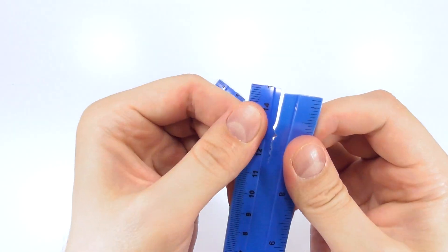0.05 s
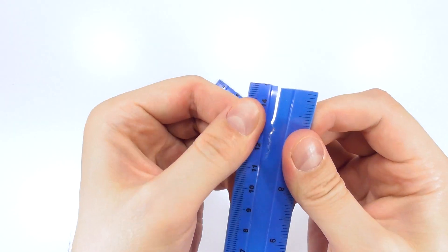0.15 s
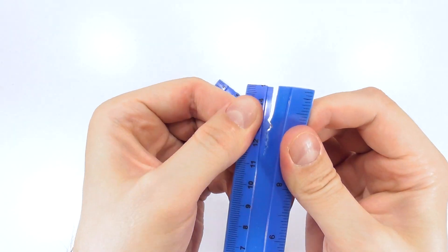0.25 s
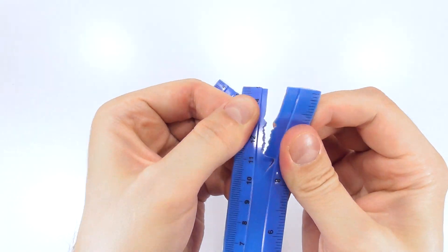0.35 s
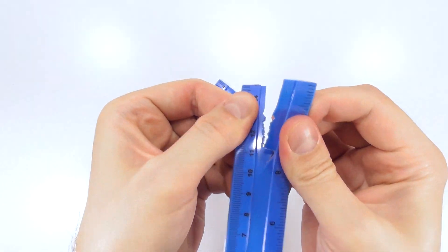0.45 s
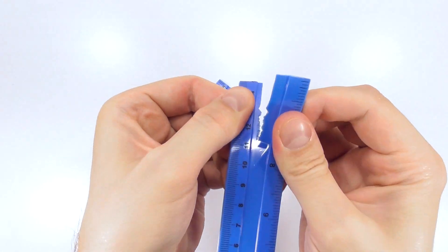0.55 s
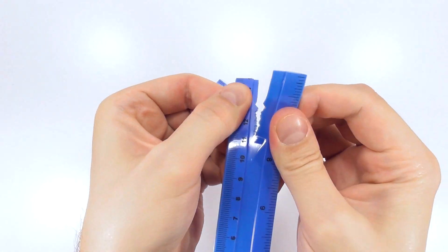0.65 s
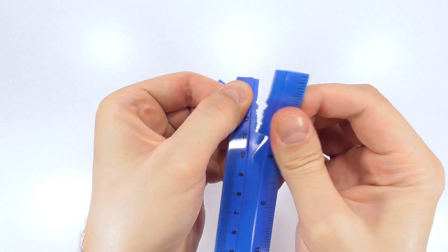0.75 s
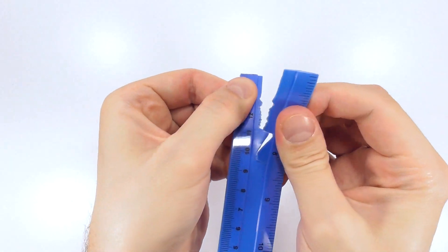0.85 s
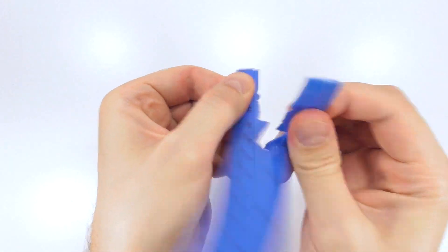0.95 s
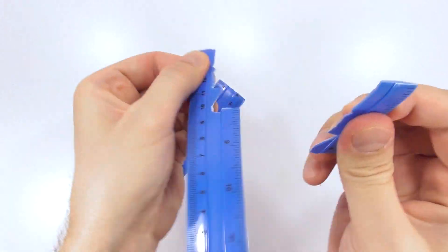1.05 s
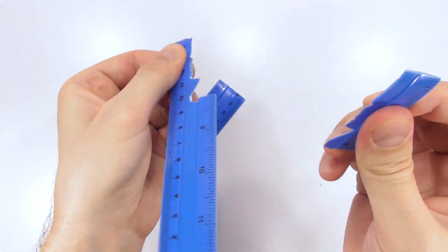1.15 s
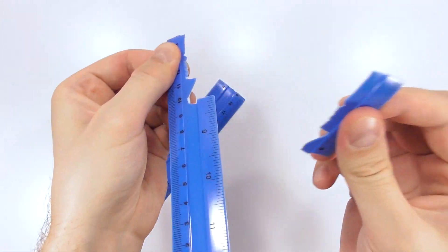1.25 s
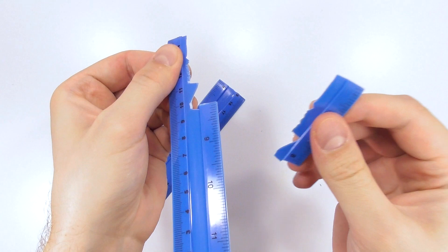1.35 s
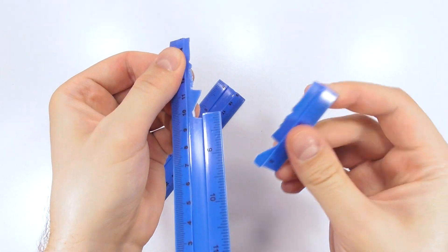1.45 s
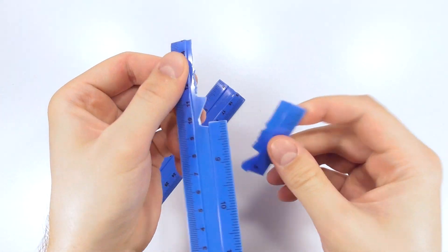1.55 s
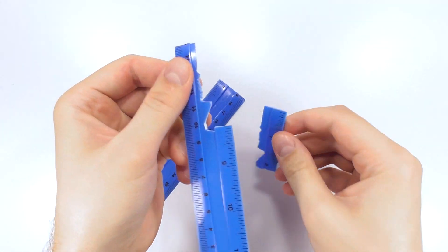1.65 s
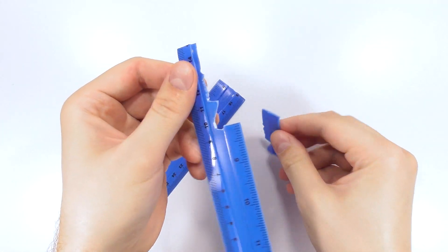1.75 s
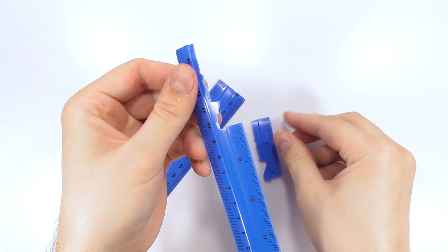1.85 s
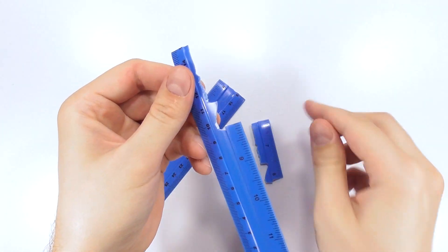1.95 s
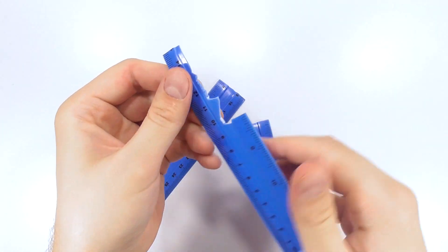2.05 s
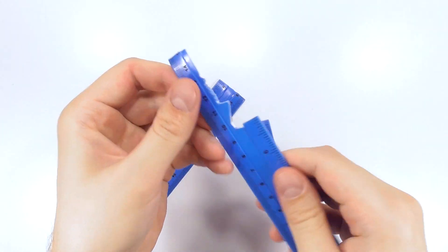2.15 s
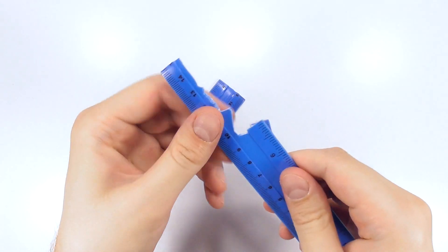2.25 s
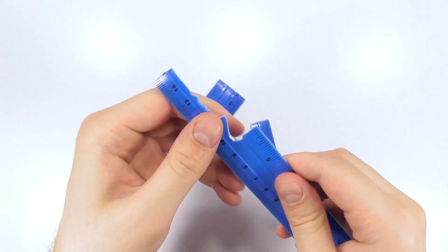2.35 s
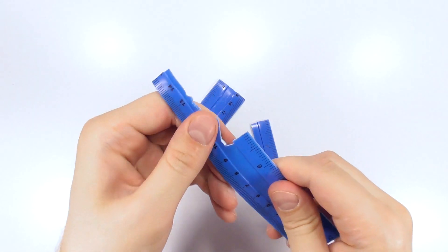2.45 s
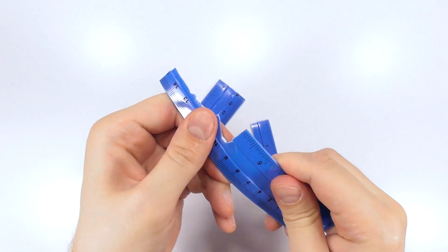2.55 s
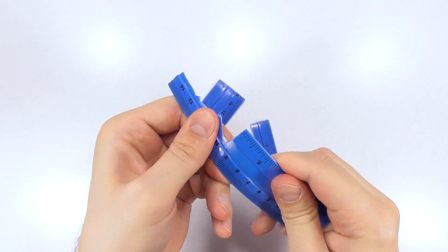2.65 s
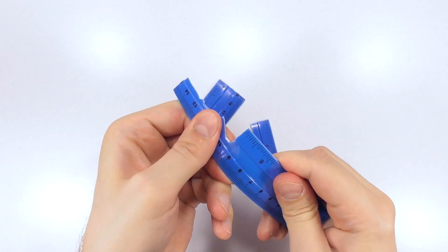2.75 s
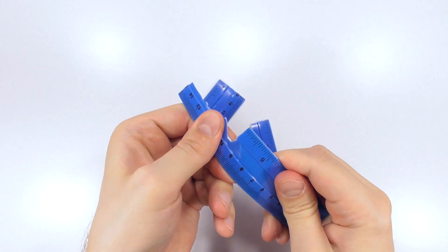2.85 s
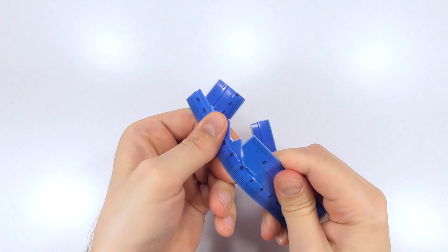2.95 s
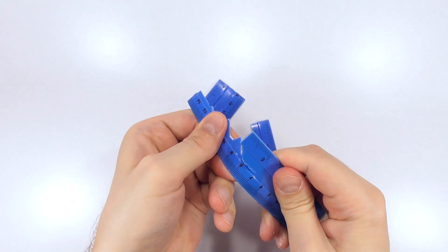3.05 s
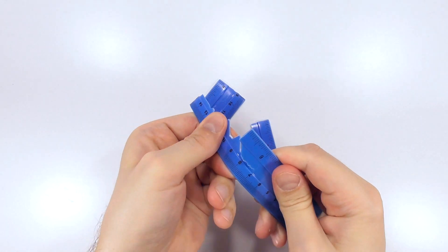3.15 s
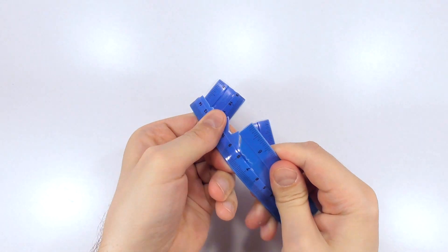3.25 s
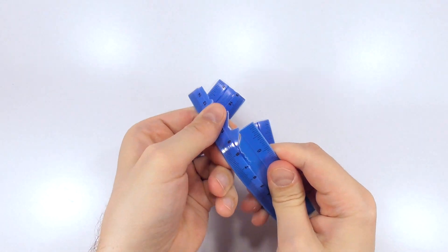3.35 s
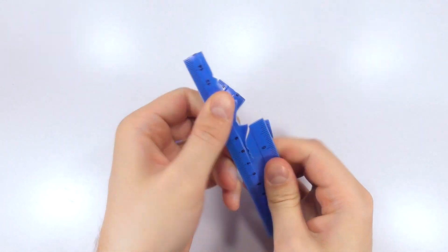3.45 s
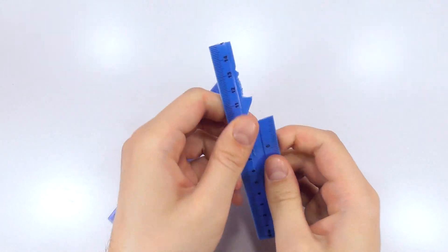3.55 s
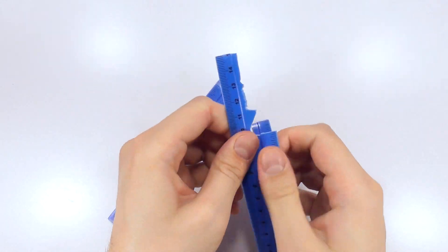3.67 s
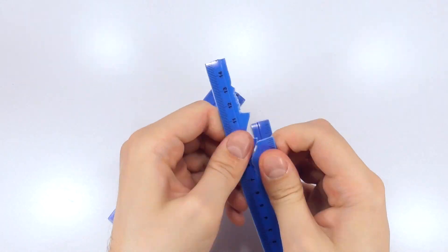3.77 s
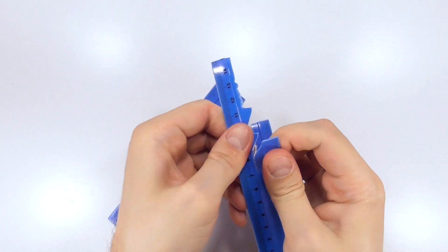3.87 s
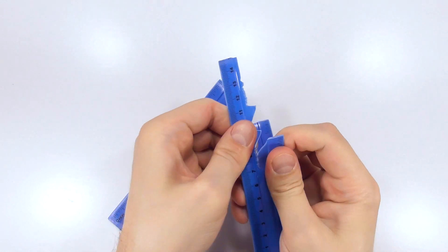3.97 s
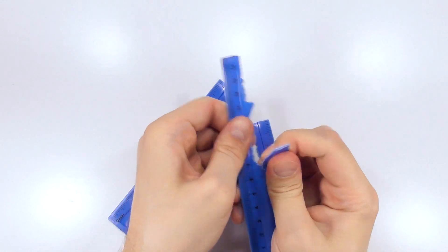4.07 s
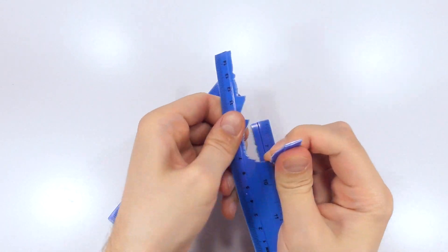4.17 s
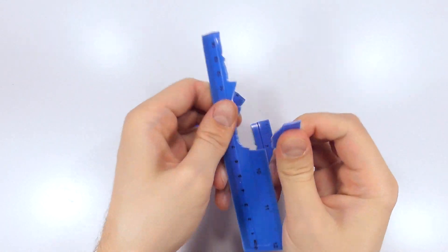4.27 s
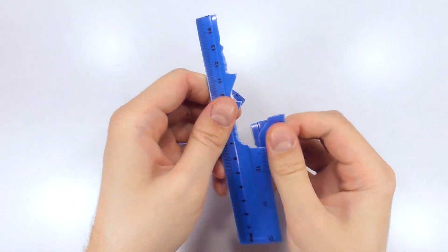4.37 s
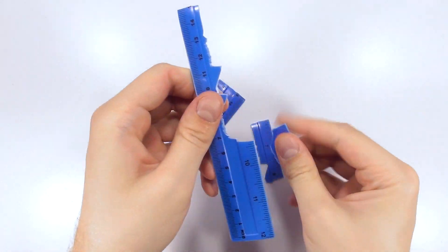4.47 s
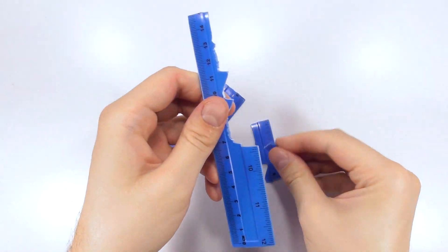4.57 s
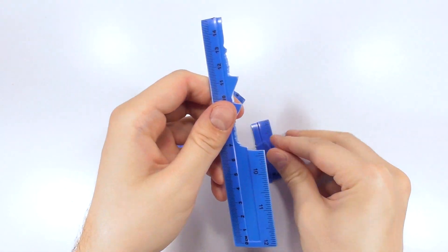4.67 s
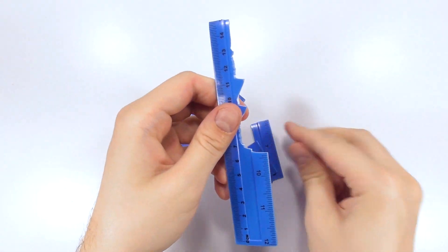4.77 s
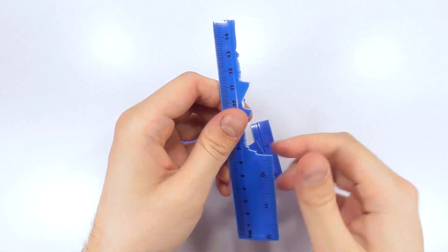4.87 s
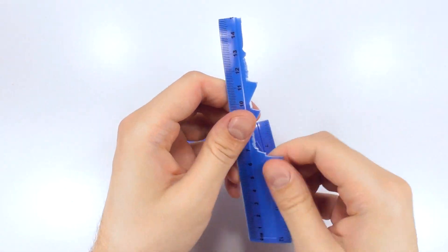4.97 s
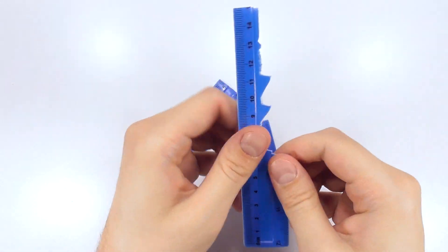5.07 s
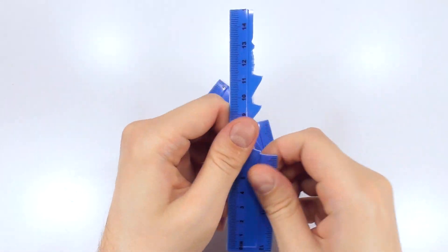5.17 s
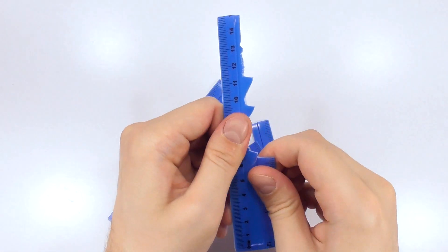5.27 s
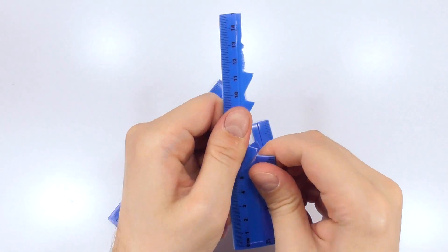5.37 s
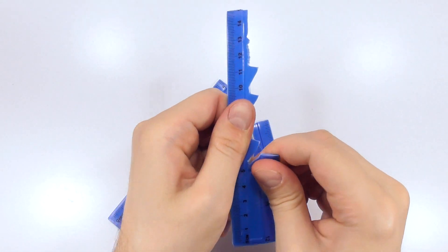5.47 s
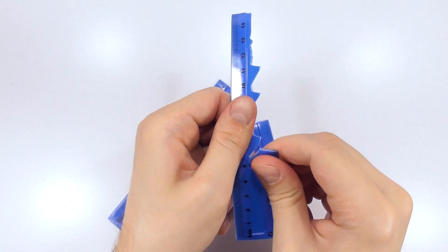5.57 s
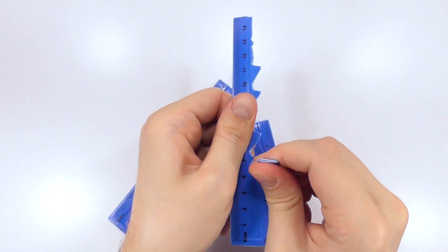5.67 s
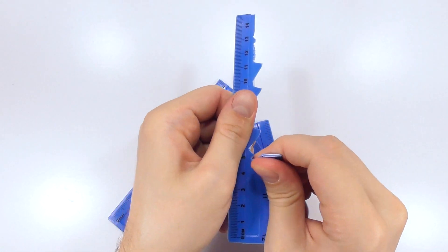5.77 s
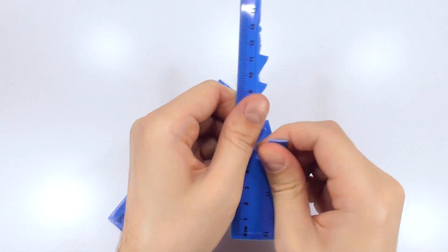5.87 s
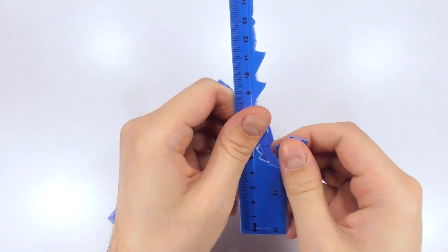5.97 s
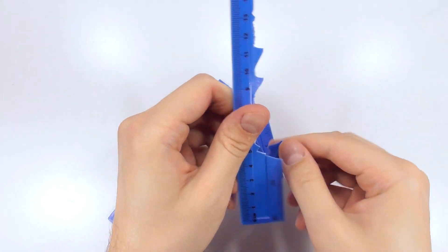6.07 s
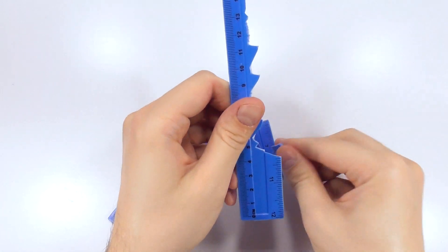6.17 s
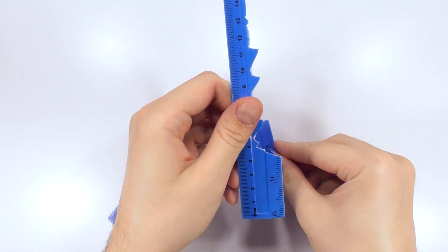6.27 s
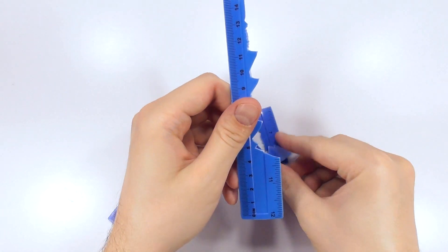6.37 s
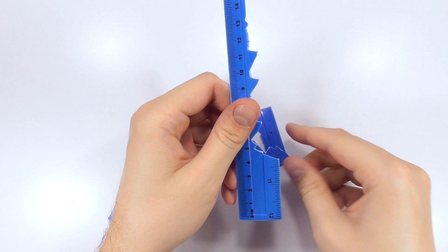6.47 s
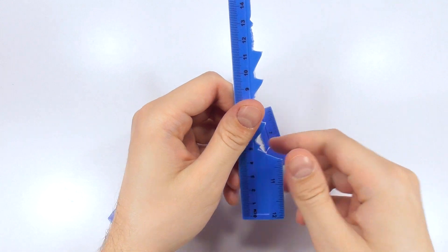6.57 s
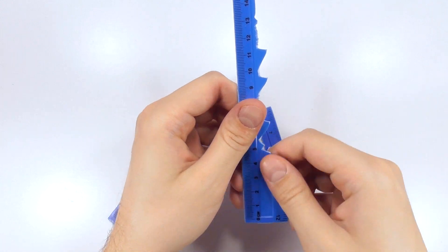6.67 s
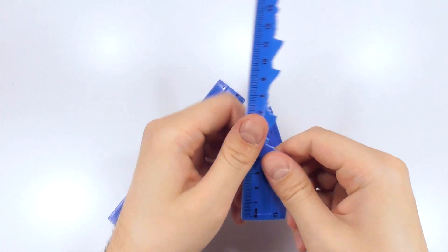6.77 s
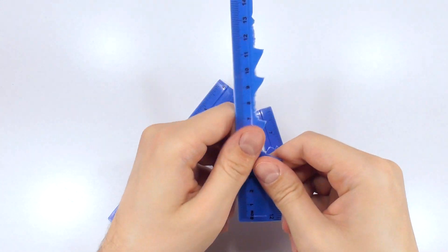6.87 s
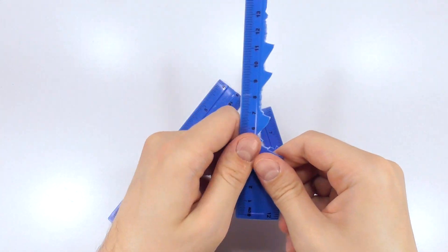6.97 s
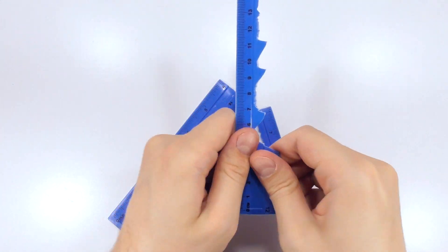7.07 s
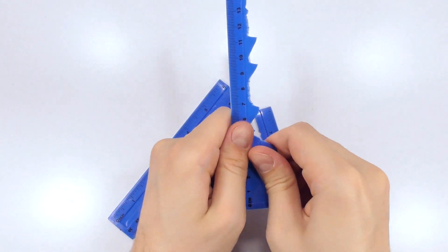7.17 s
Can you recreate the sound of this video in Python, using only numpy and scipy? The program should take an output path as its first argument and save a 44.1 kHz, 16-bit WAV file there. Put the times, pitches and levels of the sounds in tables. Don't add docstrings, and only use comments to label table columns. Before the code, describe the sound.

A brittle plastic ruler snaps repeatedly in the hands with harsh, overloading cracks, while broken pieces clatter onto a pile in a quiet room.

```python
import sys
import numpy as np
from scipy import signal
from scipy.fft import rfft, irfft, next_fast_len
from scipy.io import wavfile
from scipy.ndimage import map_coordinates

SR = 44100
rng = np.random.default_rng(int(sys.argv[2]) if len(sys.argv) > 2 else 0)


def volts_from_db(level):
    exponent = np.asarray(level, float) / 20
    return 10 ** exponent


def to_wav(s):
    ch = np.atleast_2d(s).T
    pcm = np.round(np.clip(ch, -1, 1) * 32767)
    wavfile.write(sys.argv[1], SR, pcm.astype(np.int16))


N = 318402

# pitch_hz, density_db_per_hz
ROOM_SPECTRUM = [(20, -21.5), (70, -19), (100, -23.5), (118, 1.5), (240, -6.5), (323, -12.5), (1140, -16.5),
                 (1330, -24), (1650, -32.5), (2100, -29.5), (4200, -38), (4950, -45), (5800, -37.5),
                 (8650, -31), (15200, -35.5), (16500, -56)]
# pitch_hz, width_hz, level_db (against the room noise)
HUM_LINES = [(129.7, 0.95, -6.5), (194, 11, -8.5), (240, 8, -9.5), (601.2, 10, -11), (750, 6.6, -26),
             (919, 11, -16.5), (1149, 2.6, -14.5)]
# pitch_hz, likeness_0_to_1
ROOM_LIKENESS = [(60, 0.58), (1500, .9), (5000, 1), (9000, 0.13)]
# pitch_hz, likeness_0_to_1
CLOSE_LIKENESS = [(1400, .92), (2800, 1), (5500, 1), (10000, 0.99), (14000, .6)]

# start_s, peak_db, body_db
TICKS = [(0.0074, -32, -14), (0.0703, -33, -11), (0.2264, -34.5, -15.5), (1.4493, -41.5, -13),
         (1.728, -34, -21), (2.1592, -29.5, -4), (2.4283, -36.5, 5.5), (2.563, -45.5, 1),
         (2.6894, -46, -14), (3.2974, -45.5, -9.5), (3.4726, -21, -9.5), (3.4894, -30, -6),
         (3.5608, -43, -13), (3.6124, -28, -25), (3.6185, -29, -18), (3.712, -33, -7), (3.7755, -51, 0),
         (3.763, -46.5, 2.5), (4.384, -38.5, -7), (4.4144, -46, 1.5), (4.9835, -54.5, 13.5),
         (4.998, -28, -3), (5.0473, -34, -24), (5.2682, -28.5, -2), (5.2765, -42, -9), (5.364, -51, -19.5),
         (5.4015, -50, 11), (5.508, -34.5, -4), (4.104, -35, -1), (1.3, -57, -20), (5.9934, -42, -3.5),
         (6.034, -51, -15), (1.7015, -47, 3.5), (6.2478, -51.5, -5), (6.265, -55.5, -6.5),
         (6.0055, -43.5, -9), (6.092, -37, -1), (6.66, -40.5, 0), (6.6798, -24, -9), (6.7397, -42.5, 4),
         (7.0625, -39.5, 0), (7.162, -47, 10)]
# start_s, peak_db, length_s, body_db
RUBS = [(1.4292, -55, 0.03, -17), (1.5836, -45, 0.0077, -14), (1.7, -52.5, 0.062, -4),
        (1.764, -45, 0.06, 1.5), (1.7921, -58, 0.011, 16.5), (1.8194, -65, 0.04, 15),
        (2.1824, -24.5, 0.022, -11.5), (2.3347, -46.5, 0.022, -7.5), (3.4174, -47, 0.05, -6),
        (3.4754, -34, 0.048, -6), (3.5403, -39, 0.032, -1), (3.5892, -34.5, 0.027, 1.5),
        (3.6284, -40.5, 0.022, 1), (3.686, -43.5, 0.028, 2), (3.7794, -44.5, 0.03, -1.5),
        (4.2394, -42.5, 0.043, -5), (4.3365, -43.5, 0.035, -0.5), (4.5707, -47.5, 0.065, -4.5),
        (5.0004, -28.5, 0.027, -13.5), (5.021, -34.5, 0.019, 0), (5.086, -35, 0.023, -2),
        (5.1547, -34, 0.021, -1), (5.192, -52, .035, -1), (5.282, -48.5, 0.023, -3),
        (3.603, -35.5, 0.01, 0.5), (3.714, -41, 0.013, -17), (6.078, -43.5, 0.015, -8.5),
        (6.25, -57, 0.026, 2.5), (5.234, -44.5, 0.021, 3.5), (5.304, -54, 0.017, 9.5),
        (5.403, -54, 0.012, 5), (6.6836, -28, 0.036, -9), (6.751, -34, 0.02, -3),
        (6.8497, -49, 0.035, -4.5), (6.8907, -35, 0.031, -14), (7.0224, -35, 0.045, -7)]
# start_s, peak_db, length_s,
# body_db
SLIDES = [(0.986, -1.5, 0.00056, -15), (1.836, -52.5, .03, 11.5), (1.851, -45, 0.012, 10.5),
          (1.88, -44, 0.071, -3.5), (1.955, -40, 0.055, -5), (1.999, -44.5, 0.11, -2.5),
          (4.709, -30, 0.0066, -8), (4.723, -27, 0.06, -8.5), (4.766, -33, 0.058, -15.5),
          (6.29, -26, 0.012, -9), (6.318, -33.5, 0.025, -3.5), (6.375, -47, 0.05, 0.5),
          (6.46, -21, 0.033, -14), (6.49, -43.5, 0.079, -11), (6.335, -35, 0.044, -8)]
# pitch_hz, density_db_per_hz
PLASTIC_SPECTRUM = [(880, -27), (1500, -32), (1800, -26.5), (2010, -13), (2380, -15.5), (3480, -4),
                    (5000, -8.5), (5930, 10), (8770, 14.5), (11300, 2.5), (15200, -5.5), (16000, -13),
                    (16500, -48)]
# pitch_hz, level_db, t60_s
RULER_MODES = [(2057, -25, 0.065), (2960, -32, 0.0025), (3380, -30, 0.0025)]
# pitch_hz, level_db, t60_s
RUSTLE_MODES = [(2355, -20, 0.0076), (3830, -15.5, .015), (4530, -19.5, 0.014), (5600, -15.5, 0.014)]

# start_s, crack_db, echo_db, echo_under_5khz_db, echo_over_11khz_db
FRACTURES = [
    (0.3594, -3, -40, -2, 5.5),
    (0.777, -8, -40, -7.5, -1.5),
    (0.9626, -3, -39, 3.5, 6),
    (2.922, -1.5, -36.5, -8, 5.5),
    (4.0466, -5.5, -37.5, -7.5, -7),
    (4.0926, -5.5, -37, 1, 1),
    (5.4216, -6, -36, -1, 6.5),
    (5.6605, -5, -35, 0, 8.5),
]
FRACTURE_LOADS = [8, 6, 14, 8, 2, 0, 4, 6]
FRACTURE_BODIES = [-6, -2.5, 2.5, -3, -0.5, 0, 2, 5.5]
# pitch_hz, density_db_per_hz
CRACK_SPECTRUM = [(1120, -13), (1900, -12), (3500, -17), (4200, -12.5), (4860, -22), (7270, 2),
                  (8330, -2.5), (11000, -3), (14500, -7), (15600, -7), (16800, -22.5)]
# pitch_hz, density_db_per_hz
ECHO_SPECTRUM = [(900, -18), (2000, -21), (3300, -12), (4750, -11), (5150, -19), (5550, -9), (7300, 1.5),
                 (8500, 2.5), (11000, -6), (15500, -16.5), (16500, -35)]
# pitch_hz, t60_s
ECHO_DECAY = [(1500, 0.6), (4000, .4), (8000, 0.36), (11000, 0.23), (15500, 0.2)]
# signed_height, pitch_hz, cycles_to_die, recoil, delay_s
LURCHES = [
    [(-1.8, 170, .55, 0, .0003), (.66, 310, .8, .43, .0006), (1.5, 1200, .6, .43, .00064),
     (2.8, 440, 1.2, 0, .001), (1.6, 290, 1, -.26, .0008), (-3.5, 360, 1.1, .06, .0007),
     (2.9, 260, 1, .09, .0006), (2.3, 390, 1.4, .29, .00085)],
    [(1.2, 410, 1.9, .47, .001), (-2.8, 250, .85, 1, .00087), (-2.5, 160, .42, .05, .0009),
     (1.1, 740, 1.7, 1.2, .0012), (-2.3, 320, .77, -.15, .0005), (-1.3, 690, 2.5, -.13, .0005),
     (2.4, 310, 1.2, .13, .0008), (5.2, 260, .66, .41, .00095)],
]
# start_s, pitch_hz, width_hz
STUBS = [(.361, 2580, 70), (.361, 690, 80), (.361, 4340, 150), (.779, 690, 80), (.779, 2610, 70),
         (.964, 3710, 170), (2.924, 2970, 130), (4.094, 3180, 200), (4.803, 7300, 300), (5.002, 3050, 60),
         (5.423, 2255, 200), (5.423, 4090, 300), (5.66, 1210, 190), (5.661, 3130, 320), (1.762, 7860, 350),
         (.964, 716, 90), (.964, 2320, 120), (2.924, 2330, 100), (2.924, 3680, 150), (.779, 5870, 130),
         (.361, 1840, 100)]
# level_db, t60_s
STUB_RINGS = [(-43, 0.066), (-58.5, .2), (-59, 0.092), (-59.5, 0.23), (-58.5, 0.16), (-46, 0.13),
              (-56, 0.18), (-55.5, .2), (-35, 0.062), (-49, 0.15), (-65, 0.7), (-52.5, .25), (-49.5, 0.53),
              (-46.5, 0.46), (-54.5, .25), (-50.5, 0.28), (-51.5, .25), (-59, .25), (-55.5, 0.13),
              (-50, 0.17), (-58, 0.18)]

# start_s, level_db, pitch_hz, t60_s
KNOCKS = [(0.985, -37, 410, 0.018), (1.037, -32.5, 83, 0.066), (1.046, -40, 259, 0.018),
          (1.059, -42, 150, 0.03), (1.793, -31.5, 550, 0.055), (1.796, -36, 960, 0.063),
          (1.7926, -40, 1800, 0.018), (1.7935, -40, 2500, .02), (1.793, -41, 1250, .02),
          (1.794, -35.5, 720, .03), (1.795, -39, 360, .04), (1.838, -41.5, 380, .04),
          (1.803, -35, 540, .05), (1.806, -55, 1300, .03), (1.836, -39.5, 580, .05),
          (1.851, -43, 897, 0.045), (1.851, -53, 1123, .02), (1.876, -42.5, 1700, .015),
          (1.8752, -51, 1400, .015), (1.873, -28.5, 548, 0.013), (5.6617, -10, 1230, 0.01),
          (5.6618, -2.5, 2300, 0.0034), (.96315, -12.5, 1200, 0.0071), (1.069, -41, 110, .03),
          (6.33, -50, 65, 0.16), (6.0941, -37.5, 980, 0.023), (4.692, -40.5, 420, .03),
          (4.719, -39, 310, 0.028), (4.746, -46, 770, .03), (4.767, -46, 290, 0.046),
          (4.803, -47, 490, 0.037), (6.286, -43.5, 366, 0.044), (6.315, -44, 290, .05),
          (6.345, -46, 460, .05), (6.375, -43.5, 340, 0.036), (6.456, -41, 600, 0.019)]
# start_s, peak_db, left_right_db, clack_db
LANDINGS = [
    [(1.8357, -39, -4.5, -6), (1.8497, -25.5, 1.5, -2), (1.8545, -30.5, -0.5, -2.5)],
    [(1.8739, -4.5, -3, -8.5), (1.8755, -3.5, 0.5, -8), (1.8775, -9, -2, -9.5), (1.8838, -30.5, -0.5, -6),
     (1.897, -32, 0, -5), (1.95, -15.5, -1, -8.5), (1.9935, -17.5, -1, -11), (1.9955, -11, -1, -14.5),
     (2.0148, -22.5, -0.5, -15.5), (2.0314, -33.5, 1, -0.5), (2.0444, -42.5, 1, -0.5)],
    [(4.6912, -16, -2.5, -3), (4.709, -27, 2.5, 1), (4.713, -31, 4, -6), (4.7186, -9, -4.5, -4.5),
     (4.7208, -10.5, 2, -9), (4.7252, -13, 1, -10), (4.7295, -27, -3, -13), (4.7455, -19, -3, -20.5),
     (4.7495, -31.5, -4, -16)],
    [(4.7661, -21, -3, -8), (4.7735, -37, 0, -12), (4.7774, -19.5, 5, -11), (4.7935, -25, -0.5, -12),
     (4.8027, -28, -2, -8), (4.8165, -36, 7, -14)],
    [(6.2856, -18.5, -1.5, -1.5), (6.2885, -25, 1, -4), (6.293, -30, -2, -5), (6.3145, -27, 0.5, 2),
     (6.3185, -24.5, -2.5, -7.5), (6.3274, -28.5, -1, -6.5), (6.3739, -37, -0.5, 4.5)],
    [(6.3425, -32, 4.5, -14), (6.354, -38, -3.5, -14.5), (6.4103, -43, -3, -9), (6.4228, -44.5, -2, -4),
     (6.4503, -30, 0.5, -2), (6.4552, -12, 3, -9), (6.4575, -16.5, -5, -7), (6.4592, -14, -2.5, -7),
     (6.4612, -23, -6, -14), (6.4877, -16, -4, -13), (6.4915, -31, 5, -14.5)],
]
# pitch_hz, level_db, t60_s
PIECES = [
    [(2460, -11.5, .05), (3510, -9.5, 0.064), (5580, -12, 0.06), (6800, 0.5, .015), (7280, 0, 0.0483),
     (8277, -9, 0.032), (9820, -7.5, .026), (10620, -7.5, .025), (11500, -7.5, .03), (13000, -0.5, .02),
     (14010, -6, .022), (14840, -2, .026)],
    [(4040, -36, 0.04), (7900, -26, .015), (8200, -12, 0.017), (9360, -20, 0.03), (10115, 2.5, .065),
     (10595, -2.5, 0.04), (10900, -24, .05), (11610, -10, .05), (13200, -22, 0.04), (14150, -20, .05),
     (14800, -17, .015)],
    [(3850, -28, 0.035), (4350, -28, .04), (5600, -26, .05), (7130, -20, .04), (8270, -12, .04),
     (9845, 3, .05), (10110, 5, .042), (10595, -1, 0.045), (11600, -9, 0.042), (12120, -12, 0.031),
     (13400, -6, .03), (14360, -4, .023), (14850, -9.5, 0.031)],
]
# pitch_hz, level_db, t60_s
LATER_PIECES = [
    [(3850, -30, 0.11), (5730, -15, 0.084), (6900, -4, 0.062), (7320, -0.5, 0.07), (8440, -3, 0.054),
     (9000, -23, .04), (10200, 5, 0.04), (10240, -4, 0.037), (10300, -15, .05), (12060, -7, 0.053),
     (13000, -9, 0.043), (14100, -22, .04)],
    [(4070, -37.5, 0.0353), (5740, -16, .023), (7150, 3.5, 0.0329), (7720, 7.5, 0.029), (8500, 6.5, 0.017),
     (9120, 3.5, 0.026), (9990, -5, 0.065), (12070, -0.5, 0.032), (12500, -30, .014), (14700, -28, .025)],
    [(3740, -48, 0.05), (6350, -25.5, 0.016), (7700, -10, 0.11), (8700, -22, 0.057), (8860, 0.5, 0.044),
     (10060, 8.5, 0.031), (10300, -16, 0.051), (10600, -4, 0.046), (11500, 0, 0.044), (12140, -22, .05),
     (12700, -8, 0.067), (15200, -9, .04)],
]
# pitch_hz, density_db_per_hz
CLACK_SPECTRUM = [(500, -22.5), (1300, -17), (2000, -17), (3800, -9.5), (5000, -14), (6000, -4),
                  (8770, 3.5), (15200, -8), (16500, -48)]

ROOM_DB, DUCK_DB, HISS_DB = -53.5, 17.5, -13
GRAB_S, RECOVER_S, LANDING_LOAD_DB = .008, 0.2, -33
TICK_S, TICK_LOW_DB, TICK_TOP_DB, TICK_BROAD_DB = 0.0031, 0.5, -10, -10.5
RUB_LOW_DB, RUB_TOP_DB, RUB_BROAD_DB = 1, -11, -11.5
SLIDE_LOW_DB, SLIDE_TOP_DB, SLIDE_BROAD_DB = -7, -4, -2.5
LOW_FOLLOWS = 1.44
FIRM_DB, TOP_FOLLOWS = -32, 0.48
CAPSULE_HZ, CAPSULE_WOBBLE, CAPSULE_DB = 8200, .07, -3.5
TEAR_S, TEAR_NOISE_DB, TEAR_CEILING = 0.00082, -2.5, .8
DESK_S, DESK_DB = .0019, -9
PORT_CUT_HZ = 2600
HELD_DB, HELD_SHARE = 7, .3


def rms_one(x):
    return x / np.sqrt(np.mean(x ** 2) + 1e-20)


def at_hz(points, hz):
    table_hz, values = np.transpose(points)
    return np.interp(np.log(hz + 1), np.log(table_hz), values)


def colour(x, spectrum):
    log_gain = np.log(volts_from_db(at_hz(spectrum, np.fft.rfftfreq(8192, 1 / SR))))
    cepstrum = irfft(log_gain)
    cepstrum[1:4096] *= 2
    cepstrum[4097:] = 0
    taps = irfft(np.exp(rfft(cepstrum)))[:4096]
    return signal.oaconvolve(x, taps[None] / np.sqrt(np.sum(taps ** 2)), axes=1)[:, :N]


def split(x, low_hz, high_hz):
    return signal.sosfilt(signal.butter(2, [low_hz, high_hz], "band", fs=SR, output="sos"), x)


def pair(likeness):
    size = next_fast_len(N)
    alike = np.clip(at_hz(likeness, np.fft.rfftfreq(size, 1 / SR)), 0, 1)
    spectra = rfft(rng.standard_normal((2, size))) * np.sqrt([(1 + alike) / 2, (1 - alike) / 2])
    mid, side = irfft(spectra, size)[:, :N]
    return mid + side * [[1], [-1]]


def patchy(x, patch_db, width_hz, length_s):
    _, _, z = signal.stft(x, SR, nperseg=1024)
    across_pitch = np.arange(z.shape[1]) * SR / 1024 / width_hz
    across_time = np.arange(z.shape[2]) * 512 / SR / length_s
    places = np.meshgrid(across_pitch, across_time, indexing="ij")
    field = map_coordinates(rng.standard_normal((400, 400)), places, order=1, mode="mirror")
    _, patched = signal.istft(z * volts_from_db(patch_db * field), SR, nperseg=1024)
    return rms_one(patched[:, :N]) * np.std(x)


def clicks(times, heights):
    out = np.full((2, N), 1e-18)
    np.add.at(out, (slice(None), np.round(np.asarray(times) * SR).astype(int)), heights)
    return out


def fade(x, t60):
    return signal.lfilter([1], [1, -volts_from_db(-60 / (t60 * SR))], x)


def ring(x, hz, t60):
    r, w = volts_from_db(-60 / (t60 * SR)), 2 * np.pi * hz / SR
    return signal.lfilter([0, np.sin(w)], [1, -2 * r * np.cos(w), r * r], x)


def panned(db, pan_db):
    return volts_from_db(np.array([db + pan_db / 2, db - pan_db / 2]))


def ducking():
    hits = np.concatenate(LANDINGS)
    load = clicks(np.transpose(FRACTURES)[0], volts_from_db(np.array(FRACTURE_LOADS)))
    load += clicks(hits[:, 0], volts_from_db(hits[:, 1] + LANDING_LOAD_DB))
    held = signal.lfilter([1], [1, -np.exp(-1 / (RECOVER_S * SR))], load[0])
    grab = np.exp(-1 / (GRAB_S * SR))
    charge = signal.lfilter([1 - grab], [1, -grab], held)
    return -DUCK_DB * np.tanh(charge)


def room():
    air = colour(pair(ROOM_LIKENESS), ROOM_SPECTRUM)
    air = air / np.std(split(air, 68, 1300))
    hum = pair(ROOM_LIKENESS)
    for hz, width_hz, db in HUM_LINES:
        air = air + volts_from_db(db) * rms_one(ring(hum, hz, 2.2 / width_hz))
    hiss = split(air[:, ::-1], 2500, 17000)
    return volts_from_db(ROOM_DB + ducking()) * air + volts_from_db(ROOM_DB + HISS_DB) * hiss


def weighted(rows, low_db, top_db, broad_db, ruler_db=0):
    contacts = []
    for s, db, length_s, body_db in rows:
        low = low_db + LOW_FOLLOWS * body_db
        top = top_db + TOP_FOLLOWS * (db - FIRM_DB)
        contacts.append((s, db, length_s, low, body_db, top, ruler_db, broad_db))
    return contacts


def contact_sound(contacts, level_db, grain_db):
    envelopes = np.zeros((6, N))
    for s, db, length_s, low_db, middle_db, top_db, ruler_db, broad_db in contacts:
        t = np.arange(round(3 * length_s * SR)) / SR / length_s
        shape = np.minimum(t / 0.13, 1) / (1 + t ** 4)
        weights_db = np.array([low_db, middle_db, 0, top_db, middle_db + ruler_db, middle_db + broad_db])
        i = round(s * SR)
        envelopes[:, i:i + len(t)] += np.outer(volts_from_db(db + weights_db), shape)[:, :N - i]
    low_env, middle_env, high_env, top_env, ruler_env, broad_env = envelopes
    grain = np.repeat(rng.standard_normal(N // 60 + 1), 60)[:N]
    slips = patchy(pair(CLOSE_LIKENESS), patch_db=4.0, width_hz=430, length_s=0.036) * volts_from_db(grain_db * grain)
    low = 4.8 * split(low_env * slips, 630, 1236)
    middle = 7.67 * split(middle_env * slips, 2400, 3700)
    held = 2.8 * split(ruler_env * slips, 1800, 3800)
    middle = middle + sum(volts_from_db(db) * ring(held, hz, t60) for hz, db, t60 in RULER_MODES)
    broad = split(broad_env * slips[:, ::-1], 1200, 6000)
    broad = broad + sum(volts_from_db(db) * ring(broad, hz, t60) for hz, db, t60 in RUSTLE_MODES)
    high = split(high_env * slips, 7100, 13000)
    top = 4 * split(split(top_env * slips, 11000, 17000), 13000, 19000)
    plastic = low + broad + colour(middle + high + top, PLASTIC_SPECTRUM)
    return volts_from_db(level_db) * plastic * panned(0, -1.3)[:, None]


def ticks():
    rows = np.insert(TICKS, [2], TICK_S, axis=1)
    contacts = weighted(rows, TICK_LOW_DB, TICK_TOP_DB, TICK_BROAD_DB)
    return contact_sound(contacts, -10.5, grain_db=4.0)


def cracks():
    s, crack_db, *_ = np.transpose(FRACTURES)
    start = clicks(s, panned(crack_db, 0))
    tear = signal.lfilter(np.ones(round(TEAR_S * SR)), [1], start)
    envelope = 1.35 * tear + 0.4 * fade(start, 0.014) + 0.094 * fade(start, 0.011)
    noise = volts_from_db(TEAR_NOISE_DB) * colour(envelope * pair(CLOSE_LIKENESS), CRACK_SPECTRUM)
    latest = np.maximum(np.searchsorted(s, np.arange(N) / SR + .001) - 1, 0)
    body_gain = volts_from_db(np.array(FRACTURE_BODIES))[latest]
    out = split(noise, 5000, 20000) + body_gain * split(noise, 1300, 5000)
    knots = np.arange(N // 16 + 2)
    wobble = np.interp(np.arange(N) / 16, knots, rng.standard_normal(len(knots)))
    phase = 2 * np.pi * np.cumsum(CAPSULE_HZ * (1 + CAPSULE_WOBBLE * wobble)) / SR
    out += volts_from_db(CAPSULE_DB) * envelope * np.sin(phase)
    out = TEAR_CEILING * np.tanh(out / TEAR_CEILING)
    return out + volts_from_db(DESK_DB) * np.roll(out, round(DESK_S * SR), axis=1)


def lurches():
    recoil_s = 0.00063
    out, t = np.zeros((2, N)), np.arange(1500) / SR
    late = np.maximum(t - recoil_s, 0)
    creep = -.09 * (1 - np.exp(-late / .0015)) * np.exp(-late / 0.0022)
    for port, rows in enumerate(LURCHES):
        for (s, *_), (height, hz, cycles, recoil, after_s) in zip(FRACTURES, rows):
            swing = np.sin(2 * np.pi * hz * late) * volts_from_db(-60 * late * hz / cycles)
            back = -recoil * swing.max() * np.sin(np.pi * np.minimum(t / recoil_s, 1))
            i = round((s + after_s - recoil_s - .25 / PORT_CUT_HZ) * SR)
            out[port, i:i + 1500] += height * (back + swing + creep)
    return signal.sosfilt(signal.butter(2, PORT_CUT_HZ, fs=SR, output="sos"), out)


def echoes():
    s, _, echo_db, low_db, top_db = np.transpose(FRACTURES)
    noise = patchy(pair(ROOM_LIKENESS), patch_db=5.5, width_hz=130, length_s=0.16)
    noise = colour(noise, ECHO_SPECTRUM)
    out = np.zeros((2, N))
    edges = np.geomspace(900, 17500, 12)
    for k, (low_hz, high_hz) in enumerate(zip(edges, edges[1:])):
        hz = np.sqrt(low_hz * high_hz)
        db = echo_db + low_db * (hz < 5000) + top_db * (hz > 11000)
        envelope = fade(clicks(s + 0.0011, volts_from_db(db))[0], at_hz(ECHO_DECAY, hz))
        out += envelope * split(np.roll(noise, 5000 * k, axis=1), low_hz, high_hz)
    return out


def stubs():
    out, noise = np.zeros((2, N)), pair(CLOSE_LIKENESS)
    t = np.arange(SR) / SR
    for (s, hz, width_hz), (db, t60) in zip(STUBS, STUB_RINGS):
        i = round(s * SR)
        rough = rms_one(ring(noise[:, i:i + SR], hz, 2.6 / width_hz))
        out[:, i:i + SR] += volts_from_db(db - 60 * t / t60) * rough
    return out


def knocks():
    out = sum(volts_from_db(db) * ring(clicks([s], 0.99)[0], hz, t60) for s, db, hz, t60 in KNOCKS)
    return signal.lfilter([.3], [1, -.7], out)


def rubs_and_slides():
    contacts = weighted(RUBS, RUB_LOW_DB, RUB_TOP_DB, RUB_BROAD_DB)
    contacts += weighted(SLIDES, SLIDE_LOW_DB, SLIDE_TOP_DB, SLIDE_BROAD_DB, ruler_db=-40.5)
    return contact_sound(contacts, -16.0, grain_db=3.0)


def landings():
    chatter_s, first_touch = .007, 5
    wet_db, pile_t60_s = -19, 0.23
    out, clack = np.zeros((2, N)), np.zeros((2, N))
    contacts = pair([(5000, 1.0), (16000, 0.8)])
    for hits, modes in zip(LANDINGS, PIECES + LATER_PIECES):
        s, db, pan_db, clack_db = np.transpose(hits)
        touch = clicks(s, panned(db - 33.5, pan_db))
        strike = first_touch * touch + fade(touch, chatter_s) * contacts
        heard = slice(round(s.min() * SR), round(s.max() * SR) + SR // 5)
        strike = strike[:, heard]
        for k, (hz, mode_db, t60) in enumerate(modes):
            free = ring(strike, hz, t60)
            held = volts_from_db(HELD_DB) * ring(strike, hz, HELD_SHARE * t60)
            out[:, heard] += (-1) ** k * volts_from_db(mode_db) * (free + held)
        clack += clicks(s, panned(db + clack_db - 5.0, pan_db))
    out = out + colour(fade(clack, 0.011) * contacts[:, ::-1], CLACK_SPECTRUM)
    t = np.arange(SR // 3) / SR
    walls = rng.standard_normal((2, len(t))) * volts_from_db(-60 * t / pile_t60_s) * (t > .004)
    walls = rms_one(walls) / np.sqrt(len(t))
    return out + volts_from_db(wet_db) * signal.oaconvolve(out, walls, axes=1)[:, :N]


def scene():
    handling = ticks() + rubs_and_slides()
    fractures = cracks() + lurches() + echoes() + stubs()
    return room() + handling + fractures + knocks() + landings()


def band_limit(x):
    return signal.sosfilt(signal.butter(12, 16980, fs=SR, output="sos"), x)


def record(dry):
    limited = np.clip(1.432 * np.tanh(dry / 1.4), -1, 1)
    cut = signal.sosfilt(signal.cheby2(12, 80, 17000, fs=SR, output="sos"), limited)
    return band_limit(cut)


dry = scene()
out = record(dry)
to_wav(out)
```